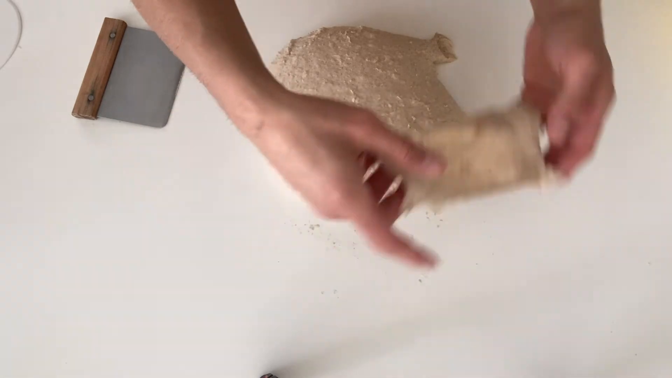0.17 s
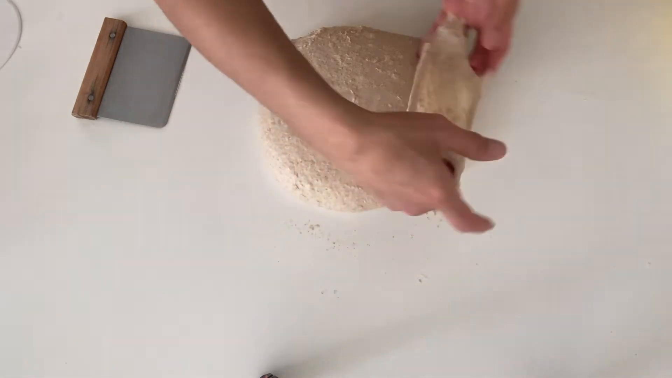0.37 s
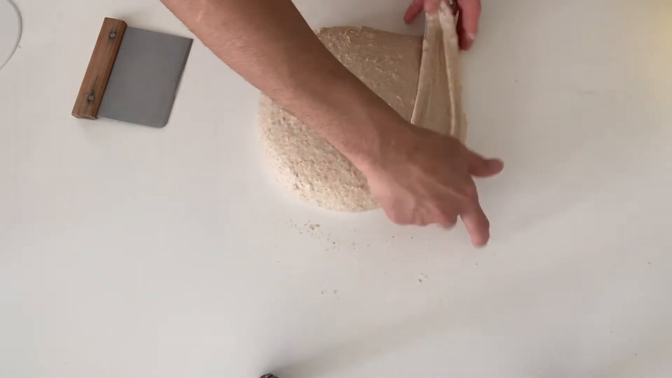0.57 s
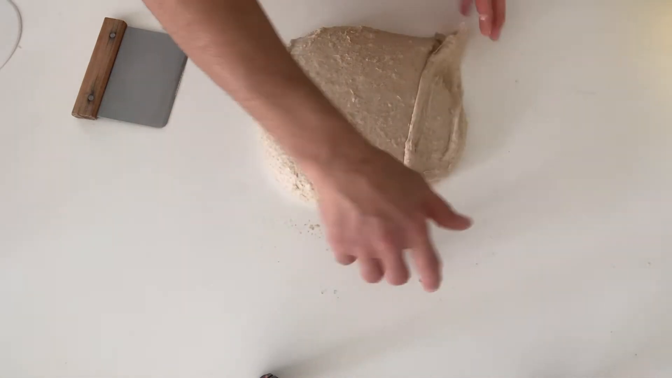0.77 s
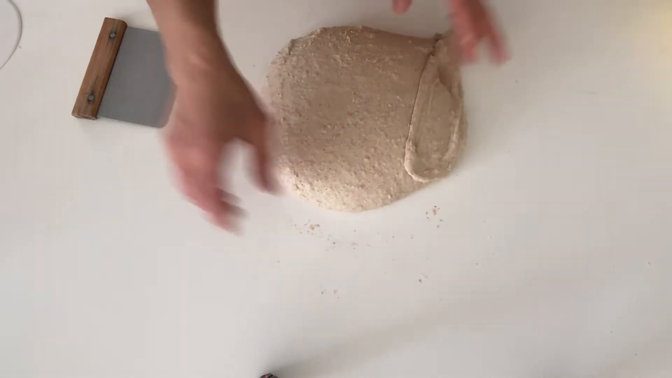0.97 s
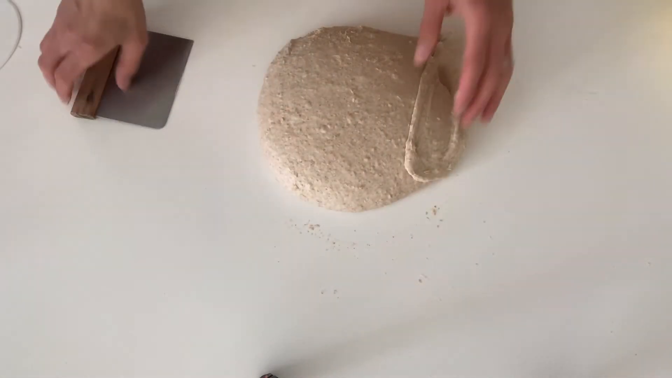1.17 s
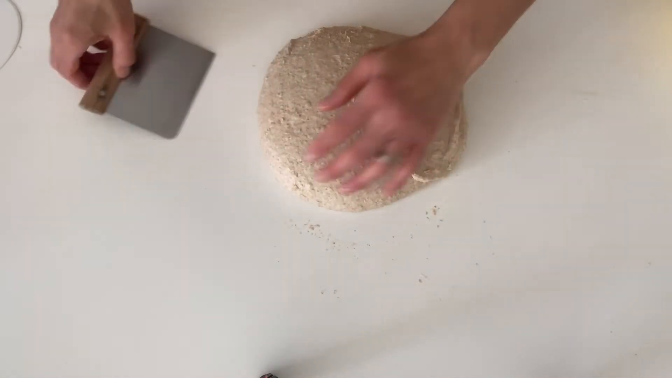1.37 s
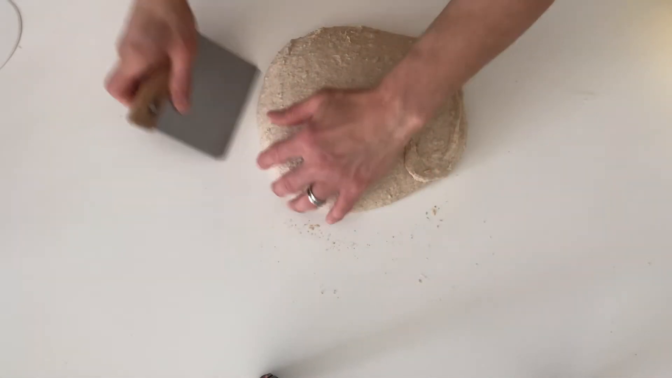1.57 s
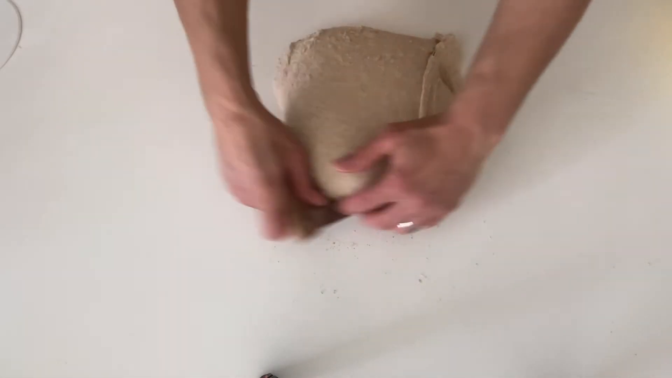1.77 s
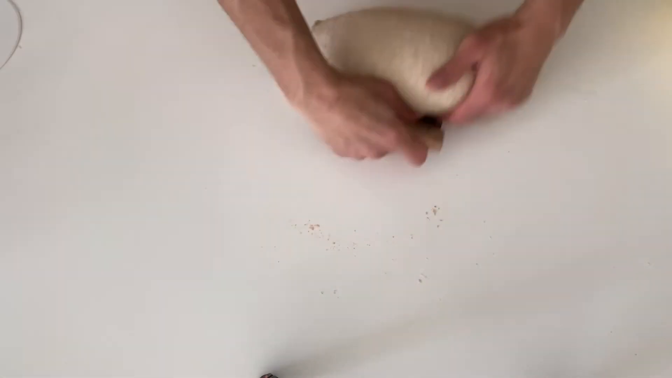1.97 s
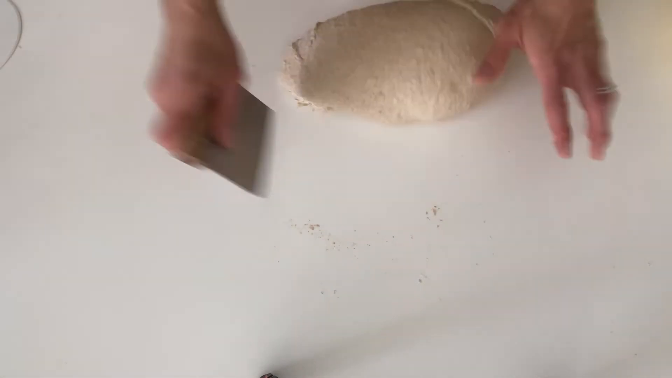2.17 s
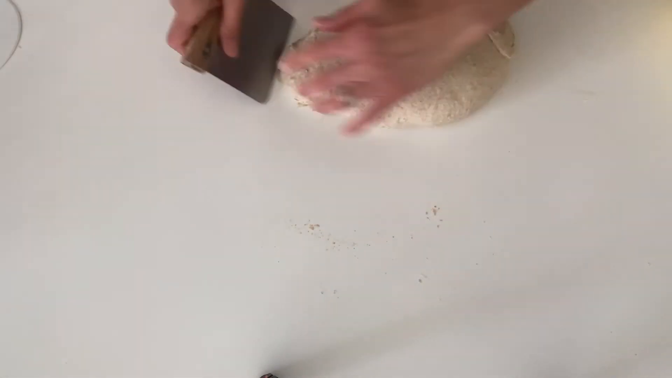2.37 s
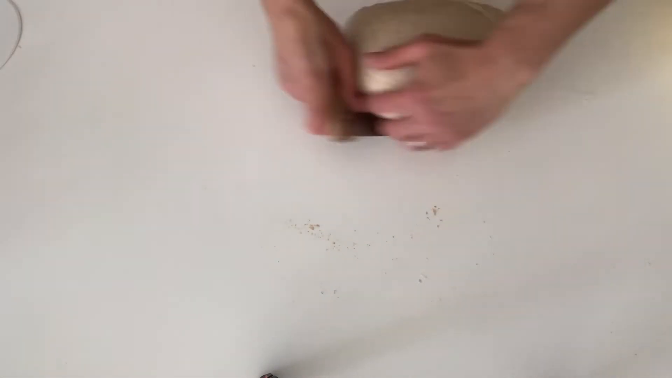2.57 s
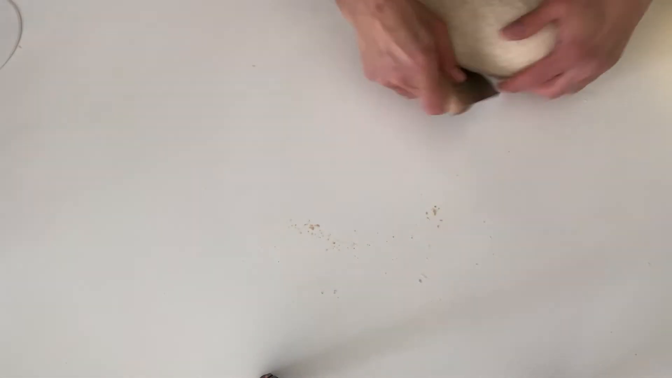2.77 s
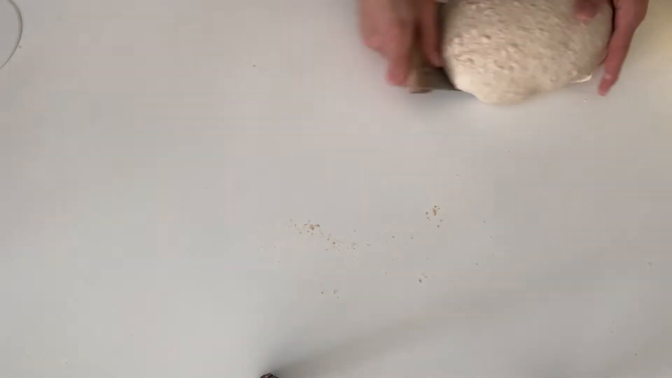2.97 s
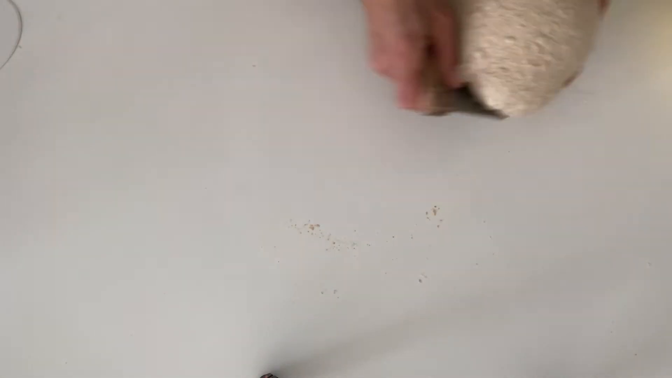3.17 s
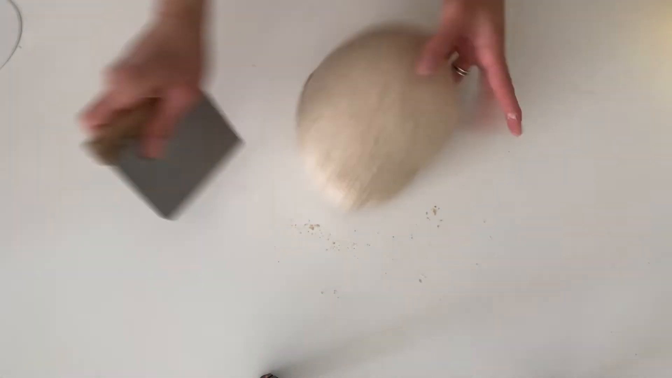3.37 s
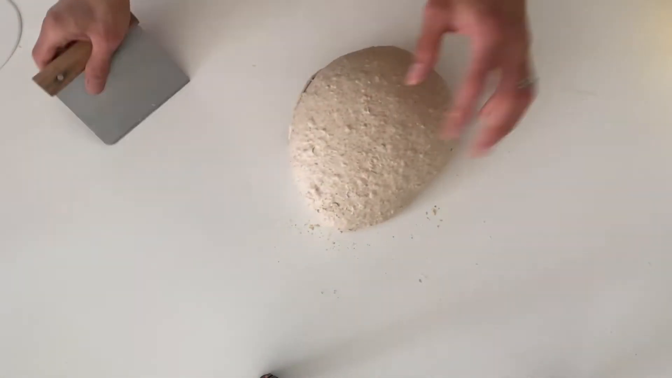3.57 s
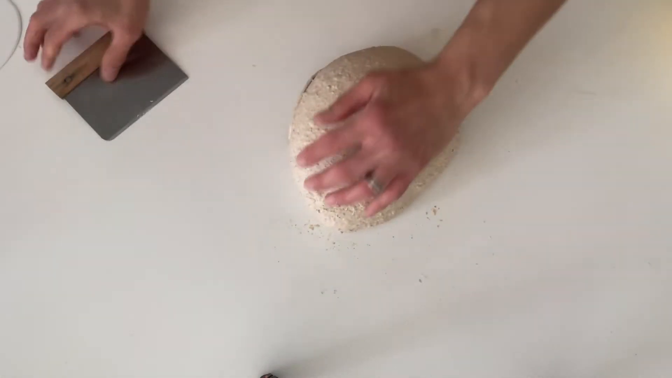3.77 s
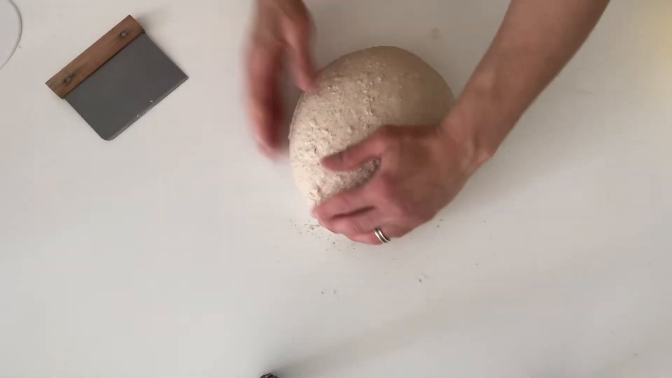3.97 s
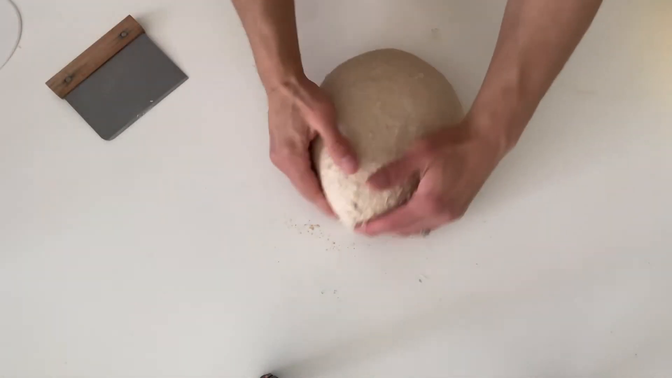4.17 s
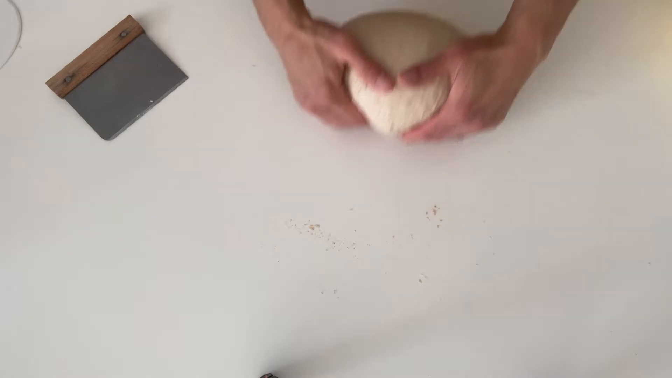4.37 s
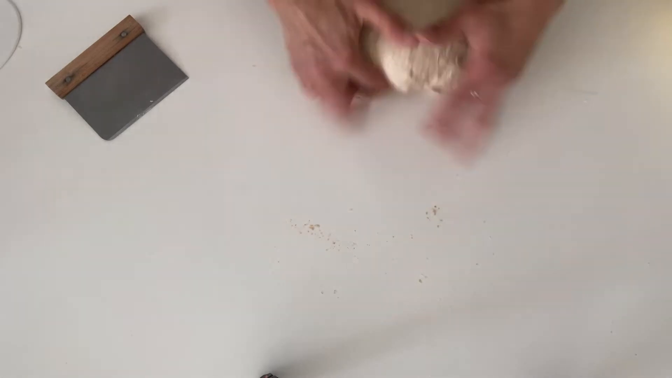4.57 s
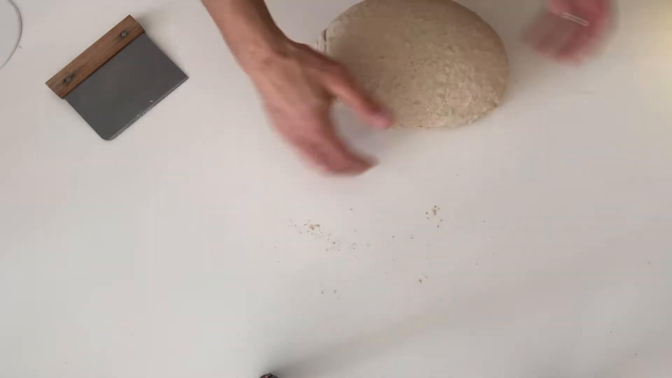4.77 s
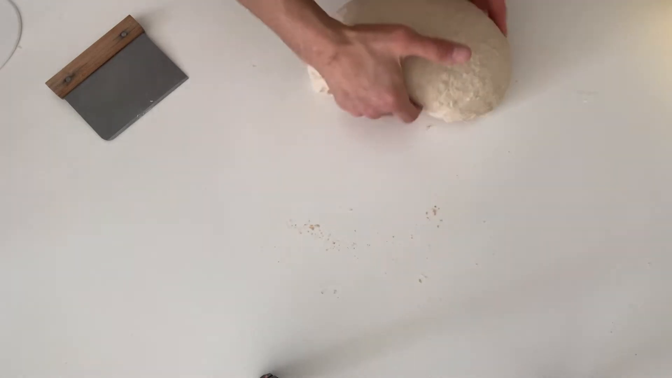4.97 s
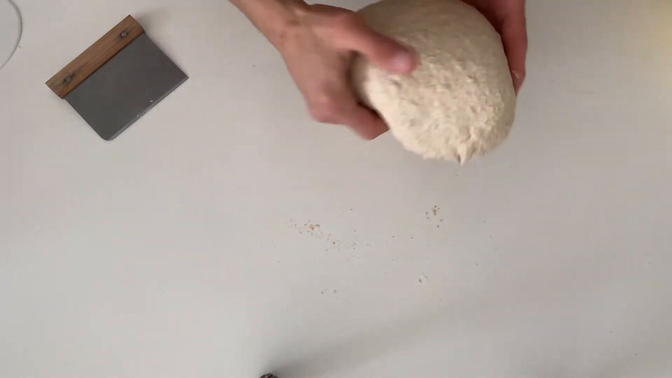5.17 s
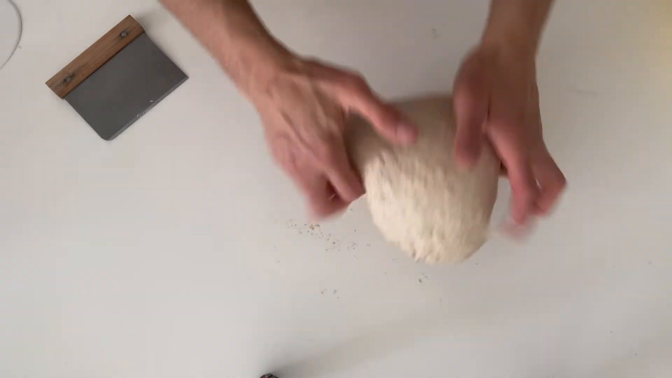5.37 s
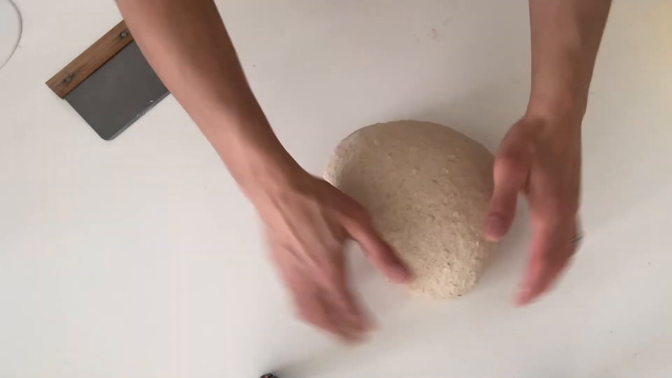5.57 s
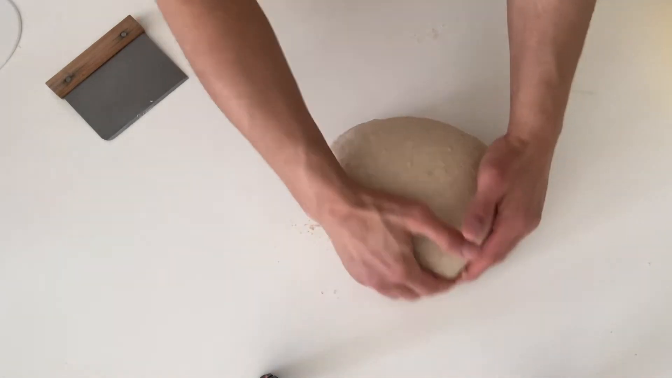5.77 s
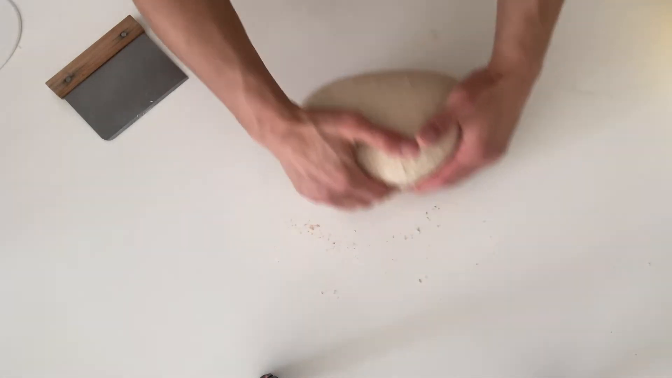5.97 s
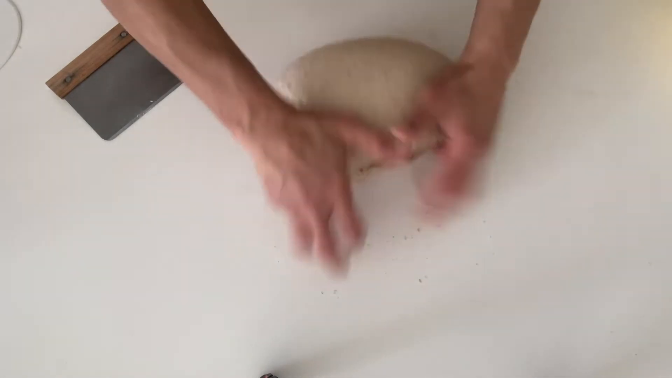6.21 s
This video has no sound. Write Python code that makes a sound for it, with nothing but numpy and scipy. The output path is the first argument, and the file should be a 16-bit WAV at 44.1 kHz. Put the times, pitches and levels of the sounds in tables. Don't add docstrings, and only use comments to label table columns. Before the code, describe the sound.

A close phone microphone in a bare, echoing kitchen, with faint room air and a distant fridge hum. From 0 to 0.8 s skin drags very softly over dough, with a dull pat at 0.85 s. Around 1.1 to 1.5 s fingers nudge a steel scraper: small ringing knocks, thin squeaks and skidding metal. At 1.58 s the edge bites and rasps brightly over floury grit until about 2.25 s, with tiny crumb crunches. A second stroke knocks and scrapes from 2.32 to 2.75 s, a shorter third from 2.87 to 3.06 s. After a lull the blade slaps free at 3.4 s, scrapes briefly at 3.55 s and drops flat at 3.73 s, the loudest clang, rattling quickly and ringing near 1.5 kHz. A light brush follows at 3.94 s. From 4.6 s palms pat and drag the dough, firmest at 4.83 s; the ball lands softly at 5.36 s, is rubbed around 5.7 s and pushed again at 6.2 s.

```python
import sys
import numpy as np
from scipy import signal
from scipy.fft import rfft, irfft, next_fast_len
from scipy.io import wavfile
from scipy.ndimage import uniform_filter1d, map_coordinates

SR = 44100
rng = np.random.default_rng(int(sys.argv[2]) if len(sys.argv) > 2 else 0)


def volts(x):
    e = np.asarray(x, float) / 20
    return 10 ** e


def output_pcm(signal):
    pcm = np.clip(np.atleast_2d(signal).T, -1, 1) * 32767
    wavfile.write(sys.argv[1], SR, np.round(pcm).astype(np.int16))


N = 275184

# (time [s], blade [dB], thud re blade [dB], click re blade [dB], contact t60 [s])
FLAT_KNOCKS = [
    (1.272, -40, -24, -38, .045),
    (3.7335, 2.5, -21.5, -17, 0.02),
    (3.753, -13.5, -23.5, -18.5, 0.017),
    (3.775, -20, -28.5, -11.5, 0.018),
    (3.778, -8.5, -36.5, -16, 0.0142),
    (3.785, -16.5, -17.5, -21.5, .016),
]
# (pitch [Hz], width [Hz], level [dB])
FREE_BLADE = [(200, 60, -18), (393, 30, -11), (475, 84, -11), (680, 120, -7.5), (1050, 900, -16.5),
              (1450, 124, -2.5), (2000, 500, -20.5), (1570, 26, -8), (3300, 3400, -25.5)]
STEEL_EDGE = [(3335, 690, -3.5), (4960, 440, -5), (7100, 2300, -5), (9900, 230, -6.5), (11500, 410, -7.5)]
GRIPPED_BLADE = [(544, 370, -0.5), (1970, 1400, -0.5)]
WORKTOP = [(39.93, 27, -8), (60.95, 30, -3), (105, 48, 0.5), (199, 57, 1.5), (317, 220, -3),
           (442.6, 130, -4)]


def unit(x):
    return x / np.sqrt(np.mean(x ** 2) + 1e-20)


def along(points, hz):
    f, v = np.transpose(points)
    return np.interp(np.log(hz + 1), np.log(f + 1), v)


def wobble(rate):
    knots = rng.standard_normal(int(N * rate / SR) + 4)
    return map_coordinates(knots, [np.arange(N) * rate / SR])


def filtered(x, response):
    m = next_fast_len(N + SR // 2)
    return irfft(rfft(x, m) * response(np.fft.rfftfreq(m, 1 / SR)), m)[..., :N]


def modes(table):
    def response(f):
        return sum((-1) ** k * volts(db) * 1j * f * width / (hz * hz - f * f + 1j * f * width)
                   for k, (hz, width, db) in enumerate(table))
    return response


def above(hz):
    return lambda f: (1j * f / (hz + 1j * f)) ** 2


def below(hz):
    return lambda f: (hz / (hz + 1j * f)) ** 2


def grit(rough_db, rate, patchy_db=2):
    z = signal.stft(rng.standard_normal(N), nperseg=256)[2]
    field = uniform_filter1d(rng.standard_normal(z.shape), size=4, axis=0)
    field = uniform_filter1d(field, size=14, axis=1)
    noise = signal.istft(z * volts(patchy_db * unit(field)), nperseg=256)[1][:N]
    return unit(noise * volts(rough_db * wobble(rate) + wobble(30)))


def per_sample(shape):
    t = np.arange(0, N + 32, 32) / SR
    return np.interp(np.arange(N) / SR, t, np.linalg.norm(volts(shape(t)), axis=0))


def swells(s, db, rise, fall):
    s, db, rise, fall = (np.reshape(v, (-1, 1)) for v in (s, db, rise, fall))
    return per_sample(lambda t: db - 20 * np.maximum((s - t) / np.abs(rise), (t - s) / np.abs(fall)))


def paired(table):
    s, db, rise, fall, rel_db = np.transpose(table)
    return swells(s, db, rise, fall), swells(s, db + rel_db, rise, fall)


def contacts(table, body, click, soft_hz, mid_db, low_db, high_db, chatter_db=0.0):
    force = np.zeros((3, 2, N + SR))
    t = np.arange(SR // 8) / SR
    for s, db, thud_db, click_db, t60 in table:
        decay = volts(chatter_db - 60 * t / np.clip(t60, .001, .2))
        chatter = rng.standard_normal((3, len(t))) * decay
        chatter[1] *= .4
        chatter[:, 0] -= [6, 5, 5]
        chatter *= volts([[db + mid_db], [db + thud_db + low_db], [db + click_db + high_db]])
        force[:, 0, round((s + .0008) * SR):][:, :len(t)] += chatter
        part = np.arange(3)
        force[part, 1, round(s * SR) + 131 * part] += np.linalg.norm(chatter, axis=1)
    paths = (lambda f: modes(body)(f) * below(soft_hz)(f),
             lambda f: modes(WORKTOP)(f) * below(900)(f),
             click)
    return sum(filtered(x[:, :N], path) for x, path in zip(force, paths))


def background():
    # (frequency [Hz], level per Hz [dB])
    air_spectrum = [(12, -49), (20, -34), (49, -10), (86, -4), (123, -6), (198, -8.5), (234, -7),
                    (270, -11), (347, -12.5), (399, -18), (590, -13.5), (738, -20.5), (2320, -32),
                    (2600, -32.5), (16000, -41)]
    # (pitch [Hz], level [dB])
    hum_lines = [(118.4, -69.5), (242.2, -79), (344.5, -80.5)]
    t = np.arange(N) / SR
    air = unit(filtered(rng.standard_normal(N), lambda f: volts(along(air_spectrum, f))))
    hum = np.zeros(N)
    for hz, db in hum_lines:
        level = volts(db + 4.0 + 1.8 * wobble(20))
        hum += level * np.sin(2 * np.pi * hz * t + 1.4 * wobble(5.6))
    return volts(-66 + 1.0 * wobble(1.4)) * air + hum


def kitchen(x):
    # (frequency [Hz], t60 [s])
    decay_times = [(100, 0.86), (500, 0.94), (1500, 0.94), (4000, 1), (8000, 0.79), (14000, 0.67)]
    out, step = np.zeros(N + 2 * SR), SR // 3
    thicken = 1 - 0.24 * np.exp(-np.arange(SR) / SR / 0.0019)
    for start in range(0, N, step):
        hz, t, z = signal.stft(rng.standard_normal(SR), SR, nperseg=256)
        decay = volts(-60 * t / along(decay_times, hz)[:, None])
        tail = thicken * signal.istft(z * decay, SR, nperseg=256)[1][:SR]
        wet = signal.fftconvolve(x[start:start + step], tail / np.linalg.norm(tail))
        out[start + 180:][:len(wet)] += wet
    return out[:N]


def palms():
    # (peak time [s], drag [dB], rise [s per 20 dB], fall [s per 20 dB], hiss re drag [dB])
    skin_drags = [(.24, -70.5, 0.06, 0.1, -6), (.58, -73, 0.2, 0.5, -2), (.852, -77, 4, 2, -17),
                  (1.1, -73, 0.2, -2.3, -7), (4.575, -71, 0.2, 0.22, 2), (4.84, -74, 0.2, 1.5, -3),
                  (4.917, -63.5, 0.18, 0.32, -8), (5.12, -71.5, 0.04, 0.1, -2),
                  (5.375, -75, 0.15, -0.4, -10), (5.435, -76.5, -0.4, 0.16, 2.5),
                  (5.668, -60.5, -0.14, 0.3, -10.5), (5.76, -68, -0.13, 0.44, -2.5),
                  (6.118, -79, -0.3, -2, -8), (6.238, -69.5, 0.24, -2, -2.5)]
    # (peak time [s], level [dB], rise [s per 20 dB], fall [s per 20 dB])
    ball_pushes = [
        (.15, -66, .4, .4),
        (.86, -63, .04, .04),
        (1.118, -60, .015, .05),
        (4.59, -64, .05, .2),
        (5.69, -67, .04, .15),
        (4.835, -55, .012, .25),
        (5.365, -54, .008, .1),
        (5.45, -59, .015, .08),
        (6.12, -67, .02, .03),
        (6.215, -58, .03, .2),
    ]
    # (peak time [s], level [dB])
    weight_shifts = [(.97, -74), (1.2, -68), (1.65, -62), (1.89, -55), (2.07, -61), (2.33, -72.5),
                     (2.48, -61), (2.91, -57), (3.42, -47), (3.54, -48), (3.76, -43.5), (4.02, -57.5),
                     (4.85, -56.5), (5.36, -55), (5.48, -59), (5.7, -64), (6.22, -56)]
    # (frequency [Hz], level per Hz [dB])
    skin_spectrum = [(180, 4.5), (300, 11), (360, -23), (528, 1.5), (701, -7), (1660, -7), (2140, -13),
                     (3290, -15.5), (16000, -34.5)]
    drag, hiss = paired(skin_drags)
    push = swells(*np.transpose(ball_pushes)) + volts(-77.5)
    weight = swells(*np.transpose(weight_shifts), 0.055, .12) + volts(-73)

    def skin(f):
        return volts(along(skin_spectrum, f))

    high = filtered(grit(2.2, 400, patchy_db=-3.5), lambda f: skin(f) * above(3500)(f))
    mid = filtered(grit(1.8, 150, patchy_db=-0.5), lambda f: skin(f) * above(350)(f) / (1 + (f / 3000) ** 4))
    low = filtered(grit(2.4, 30), lambda f: above(80)(f) / (1 + (f / 300) ** 2))
    lean = filtered(grit(1.4, 15), lambda f: above(30)(f) ** 2 / (1 + (f / 65) ** 4))
    return hiss * unit(high) + drag * unit(mid) + push * unit(low) + weight * unit(lean)


def pats():
    # (time [s], slap [dB], thud re slap [dB],
    # tack re slap [dB], contact t60 [s])
    hand_pats = [(0.0392, -60, -1, 8.5, 0.012), (0.844, -47.5, -1, -24, 0.016), (1.889, -51.5, 5, 4, 0.017),
                 (2.023, -62.5, -21, 4, 0.018), (4.573, -69, 2, -12, 0.02), (4.617, -50, -2, -13, 0.019),
                 (4.823, -52, 6.5, -17, 0.021), (4.8308, -43.5, 1.5, -19, 0.029),
                 (4.855, -61, 12, -5.5, 0.017), (5.038, -55.5, 9.5, -9, 0.018),
                 (5.4412, -47, -8, -22, 0.021), (5.4515, -53, -11, -12, 0.017), (5.634, -66, 11, 3, 0.018),
                 (5.661, -64, -2, -14, 0.03), (6.197, -66, -1, -9.5, 0.018), (6.213, -55.5, 8.5, -7, 0.016),
                 (6.234, -50.5, -10, -13, 0.016),
                 (5.3615, -45, 1, -18, 0.027),
        (5.373, -53, -1, -19, 0.013),
    ]
    dough = [(620, 98, 1.0), (1550, 1050, -7.0)]  # (pitch [Hz], width [Hz], level [dB])
    tack = lambda f: modes([(5000, 6000, 0)])(f) * above(2500)(f)
    return contacts(hand_pats, dough, tack, soft_hz=4030,
                    mid_db=10.0, low_db=22.0, high_db=3.0, chatter_db=0.5)


def skids():
    # (time [s], peak [dB], pitch [Hz], length [s],
    # sharpness [dB])
    short_skids = [
        (1.268, -49.5, 4840, 0.038, 1),
        (1.35, -43, 6990, 0.031, -28),
        (1.595, -24, 4640, 0.081, 6.5),
        (2.039, -39, 5300, 0.051, 7),
        (2.0546, -30.5, 7750, 0.025, 3),
        (2.936, -36, 7700, 0.029, 3),
        (4.587, -59, 5470, 0.028, 7),
        (4.928, -58, 6130, 0.025, 14),
        (5.131, -57.5, 6270, 0.03, -3),
        (6.107, -57.5, 6890, 0.034, 2),
                   (2.1546, -83, 9600, 0.045, -2),
        (3.15, -70, 11100, 0.02, -2),
        (3.236, -63, 8500, 0.033, -6),
        (3.265, -66, 11500, 0.025, 0),
        (3.9389, -45, 7200, 0.058, -11),
        (4.17, -58.5, 6670, 0.056, -9),
        (5.732, -63, 8630, 0.037, -1.5),
    ]
    # (time [s], peak [dB], pitch [Hz], length [s], sharpness [dB])
    crushed_crumbs = [
        (1.901, -31, 6800, 0.0025, 3),
        (2.0623, -28, 7600, 0.0043, 2.7),
        (2.516, -41, 5300, 0.0057, 3),
        (2.576, -33.5, 5450, 0.005, 3.4),
        (2.711, -39.5, 5000, 0.005, 3),
        (5.364, -46, 7650, 0.0055, 2.65),
    ]
    # (time [s], peak [dB], pitch [Hz], length [s], sharpness [dB])
    cupped_palm = [
        (5.689, -58.5, 3320, 0.19, 13),
    ]
    out, t = np.zeros(N + SR), np.arange(SR // 4) / SR
    f = np.fft.rfftfreq(len(t), 1 / SR)
    for s, db, hz, length, peak_db in [*short_skids, *crushed_crumbs, *cupped_palm]:
        peak = 1 + volts(peak_db + 2.5) / (1 + ((f - hz) / (0.15 * hz)) ** 2)
        band = peak * np.abs(above(.6 * hz)(f)) / (1 + (f / 10000) ** 2)
        noise = unit(irfft(rfft(rng.standard_normal(len(t))) * band, len(t)))
        swell = np.sin(np.pi * np.clip(t / length, 0, 1)) ** 2
        out[round((s - .2 * length) * SR):][:len(t)] += volts(db - 12.0) * noise * swell
    return out[:N]


def lift():
    # (peak time [s], edge hiss [dB], rise [s per 20 dB], fall [s per 20 dB], rasp re hiss [dB])
    skates = [
        (1.282, -59.5, -0.02, 0.22, -4.5),
        (1.38, -56, 0.0265, 0.1, 3.5),
        (1.565, -50, 0.13, 0.32, -3),
    ]
    # (peak time [s], level [dB], rise [s per 20 dB], fall [s per 20 dB])
    bumps = [
        (1.183, -53.5, -0.04, 0.16),
        (1.428, -63, -0.8, 1.3),
        (1.571, -51.5, 0, 0.1),
        (2.05, -58, -0.01, -1.3),
        (2.345, -69, -1.02, 0.8),
    ]
    # (pitch [Hz], width [Hz], level [dB])
    loose_blade = [(1430, 76, -9), (2040, 77, -7), (2520, 33, -16), (3000, 28, -20), (4900, 380, -6),
                   (6000, 35, -2), (6990, 43, -6), (7900, 160, -11), (7950, 43, -20), (8300, 80, -9),
                   (9200, 91, 0), (9600, 210, -29), (12000, 170, -18), (12000, 170, -25)]
    hiss, rasp = paired(skates)
    bump_level = swells(*np.transpose(bumps))
    song = filtered(grit(2.5, 300, patchy_db=3.5), lambda f: 0.31 * above(800)(f) + np.abs(modes(loose_blade)(f)))
    high = filtered(song, lambda f: above(3200)(f) ** 2)
    low = filtered(song, lambda f: below(3200)(f) ** 2)
    rumble = filtered(grit(1, 43), lambda f: modes(WORKTOP)(f) * above(70)(f))
    return hiss * unit(high) + rasp * unit(low) + bump_level * unit(rumble)


def squeaks():
    # (start [s], length [s], from [Hz], to [Hz], level [dB])
    locked_tones = [(1.268, 0.028, 1496, 1480, -50), (1.28, 0.15, 2620, 2460, -62),
                    (1.36, 0.069, 1450, 1370, -57), (1.36, 0.038, 7050, 7000, -58),
                    (1.45, 0.058, 2370, 2480, -62), (1.53, .05, 4900, 4850, -53.5),
                    (2.917, 0.013, 737, 740, -42.5), (2.917, 0.013, 1540, 1500, -43),
                    (2.932, .035, 5250, 5300, -50), (3.0, 0.024, 1844, 1900, -47),
                    (3.04, 0.018, 2000, 1850, -45)]
    out = np.zeros(N)
    waver = 1 + .02 * wobble(250)
    flutter = volts(3.5 * wobble(180))
    for s, length, from_hz, to_hz, db in locked_tones:
        span = slice(round(s * SR), round((s + length) * SR))
        u = np.linspace(0, 1, span.stop - span.start)
        turns = np.cumsum((from_hz + (to_hz - from_hz) * u) * waver[span]) / SR
        out[span] += volts(db) * flutter[span] * np.sin(np.pi * u) * np.sin(2 * np.pi * turns)
    return out


def touching():
    # (from [s], to [s])
    edge_down = [
        (1.577, 2.26),
        (2.323, 2.748),
        (2.869, 3.058),
        (3.362, 3.4),
        (3.542, 3.73),
    ]
    t = np.arange(N) / SR
    return uniform_filter1d(sum(1. * (t > a) * (t < b) for a, b in edge_down), size=88)


def slides():
    # (start [s], length [s], hiss [dB], change to the end [dB])
    edge_runs = [(1.58, 0.19, -45.5, -12), (1.778, 0.21, -51.5, -1.5), (1.99, .077, -63, 8),
                 (2.072, .12, -61.5, -9), (2.322, .12, -52.5, 6), (2.446, .25, -47.5, -3),
                 (2.698, .045, -55.5, -9), (2.877, .182, -46.5, -9.5), (3.364, .028, -73, -3),
                 (3.56, 0.019, -46.5, -9.5), (3.58, 0.055, -59, -11.5)]
    start_s, stop_s = 0.0057, 0.0076
    s, length, db, change_db = np.transpose(edge_runs)[..., None]

    def shape(t):
        outside = np.maximum(0, np.maximum((s - t) / start_s, (t - s - length) / stop_s))
        return db + change_db * np.clip((t - s) / length, 0, 1) - 20 * outside

    return per_sample(shape)


def strokes():
    # (peak time [s], rasp [dB], rise [s per 20 dB], fall [s per 20 dB], worktop rumble re rasp [dB])
    bites = [(1.605, -38.5, 2, 0.11, -11), (1.99, -63.5, 0.5, -0.9, -13), (2.062, -49.5, 0.03, -0.07, -23),
             (2.14, -80.5, 1.5, -3.3, 6.5), (2.332, -39.5, -0.0351, 0.1341, 1.5),
             (2.474, -56.5, 0, 0.1, -3), (2.655, -49.5, 0, 0.2, -1.5), (2.7, -48.5, 0.01, 0.05, -1.5),
             (2.875, -44, -0.1, 0.04, 3), (2.903, -45.5, 0.09, 0, -7), (3.0, -50.5, 0.08, -1, -5.5),
             (3.05, -47, 0.24, -0.2, -14.5), (3.373, -64.5, 0.4, -0.8, 4), (3.395, -54, -0.44, -0.1, 9),
             (3.56, -42, 0.16, 0.08, -6), (3.58, -54.5, -0.07, -0.6, -0.5)]
    # (frequency [Hz], level per Hz [dB])
    flour_spectrum = [(1470, -7.5), (2500, 2.5), (2920, -0.5), (5390, 6), (9010, 2), (10900, 2),
                      (14400, -0.5), (16000, 2.5)]
    # (pitch [Hz], width [Hz], level [dB])
    drum_modes = [(215, 39, -1), (340, 120, -2), (510, 190, -1), (716, 170, -2.5)]

    def edge_path(f):
        return volts(along(flour_spectrum, f)) * (1 + 0.87 * np.abs(modes(STEEL_EDGE)(f)))

    def blade_path(f):
        steel = np.abs(modes(GRIPPED_BLADE)(f)) + 0.7 * np.abs(modes(FREE_BLADE)(f))
        return steel * above(500)(f) * below(5000)(f)

    hiss, (rasp, rumble) = slides(), paired(bites)
    edge = filtered(grit(1.9, 500, patchy_db=2.5), edge_path)
    blade = filtered(grit(2.1, 260, patchy_db=2.0), blade_path)
    drum = filtered(grit(4.0, 60, patchy_db=0.0), lambda f: modes(drum_modes)(f) * below(1200)(f))
    return touching() * (hiss * unit(edge) + rasp * unit(blade) + rumble * unit(drum))


def thumps():
    # (time [s], level [dB], pitch [Hz], t60 [s])
    booms = [
        (2.325, -42, 105, .1),
        (2.872, -39.5, 140, .09),
        (3.404, -39, 62, .14),
        (3.735, -31.5, 75, .15),
        (3.736, -28, 200, .08),
        (4.8317, -43, 266, 0.059),
    ]
    out, t = np.zeros(N + SR), np.arange(SR // 3) / SR
    for s, db, hz, t60 in booms:
        out[round(s * SR):][:len(t)] -= volts(db - 60 * t / t60) * np.sin(2 * np.pi * hz * t)
    return out[:N]


def ring():
    t = np.arange(N) / SR
    t60 = 1.3
    level = sum((t > s) * volts(db - 52 - 60 * np.abs(t - s) / t60) for s, db, *_ in FLAT_KNOCKS)
    return level * volts(3.5 * wobble(22)) * np.sin(2 * np.pi * 1530 * t + 0.88 * wobble(37))


def knocks():
    # (time [s], blade [dB], thud re blade [dB], click re blade [dB], contact t60 [s])
    nudges = [
        (1.112, -45.5, -14, -12, 0.06),
        (1.13, -43, -17, -22, 0.022),
        (1.1425, -30, -15.5, -30, 0.038),
        (1.1785, -39, -2, -28, 0.046),
    ]
    # (time [s], blow [dB], thud re blow [dB], click re blow [dB], contact t60 [s])
    cuts = [(1.577, -30, -9, -4.5, 0.018), (2.126, -43, 0.5, -15, 0.019), (2.3225, -21, -8, -16.5, 0.022),
            (2.869, -24.5, -14, -7, 0.0091), (2.9015, -31.5, -15.5, -5.5, 0.0069),
            (2.921, -28.5, -23, -20.5, 0.017), (3.051, -36, -17, -16, 0.009), (3.369, -42.5, -2, -18, 0.01),
            (3.384, -46.5, 6.5, -17, 0.013), (3.5416, -21.5, -19.5, -2.5, 0.024),
            (3.547, -28.5, -19, -10, 0.014), (3.556, -30, -19.5, 2.5, 0.02),
            (3.5632, -33, -14.5, 3, 0.0086)]
    # (time [s], blow [dB], thud re blow [dB], click re blow [dB], contact t60 [s])
    snap = [
        (3.3968, -22.5, -6, -28, 0.033),
        (3.4027, -7, -22, -29, 0.008),
        (3.4118, -28, -13.5, -31.5, 0.006),
    ]
    # (pitch [Hz], width [Hz], level [dB])
    snapped_blade = [(450, 300, -6), (1000, 200, -16), (1500, 750, 0.5)]
    click = lambda f: above(3000)(f) * (1 + 1.1 * modes(STEEL_EDGE)(f)) / (1 + 1j * f / 7000)
    flat = contacts(FLAT_KNOCKS, FREE_BLADE, click, soft_hz=6090,
                    mid_db=13.5, low_db=23.0, high_db=0.0, chatter_db=-5.0)
    snapped = contacts(snap, snapped_blade, click, soft_hz=3500,
                       mid_db=4.0, low_db=23.5, high_db=-1.5, chatter_db=-10.5)
    nudged = contacts(nudges, FREE_BLADE, click, soft_hz=1760, mid_db=13, low_db=22.5, high_db=-8.0)
    cut = contacts(cuts, GRIPPED_BLADE, click, soft_hz=4370, mid_db=1.5, low_db=24.5, high_db=-1.5)
    return flat + snapped + nudged + cut


def scene():
    hits, blows = knocks() + pats()
    rubs = strokes() + lift() + palms() + skids() + squeaks()
    echoes = kitchen(volts(-8) * blows + volts(-10.0) * rubs)
    echoes = filtered(echoes, lambda f: 1 / (1 + (f / 5000) ** 2) ** .5)
    return (hits + rubs + echoes + background() + ring() + thumps())[None]


def roll_off(x):
    return signal.sosfilt(signal.butter(12, 16740, fs=SR, output="sos"), x)


def record(dry):
    def microphone(f):
        shelf = 0.04 + 1 / (1 + (f / 16040) ** 200)
        return (f < 16750) * shelf / (1 + (f / 16500) ** 8)

    return roll_off(filtered(dry, microphone))


dry = scene()
out = record(dry)
output_pcm(out)
```